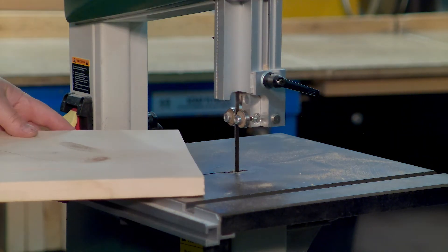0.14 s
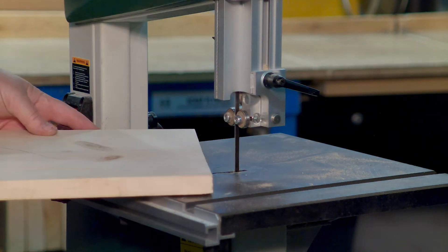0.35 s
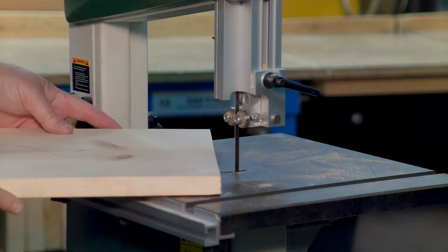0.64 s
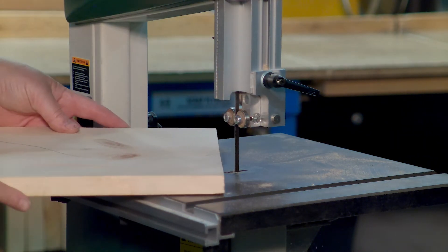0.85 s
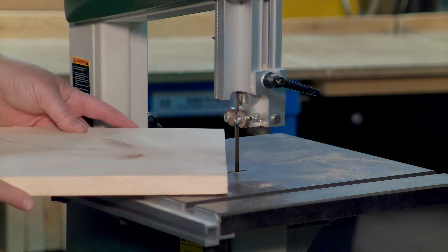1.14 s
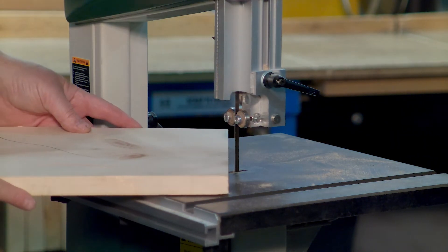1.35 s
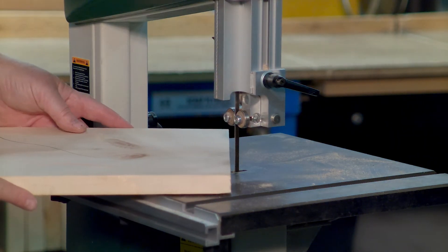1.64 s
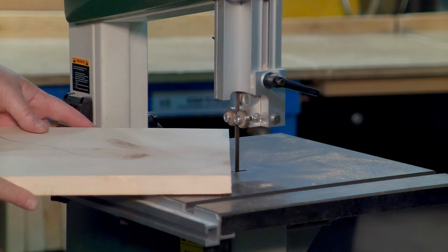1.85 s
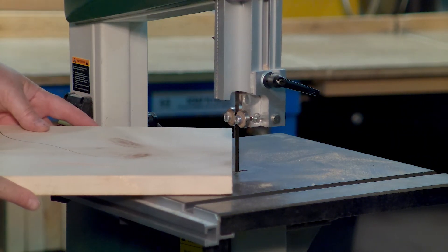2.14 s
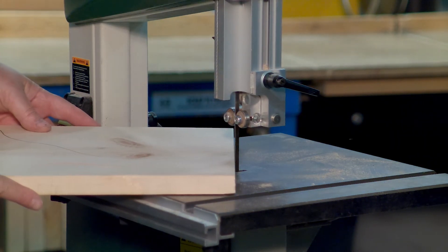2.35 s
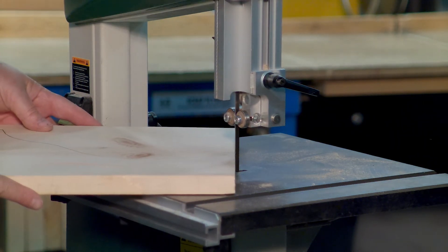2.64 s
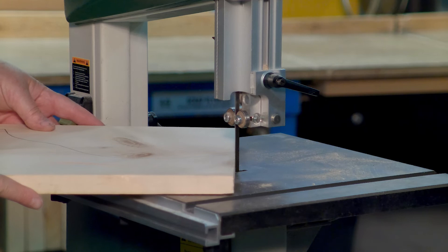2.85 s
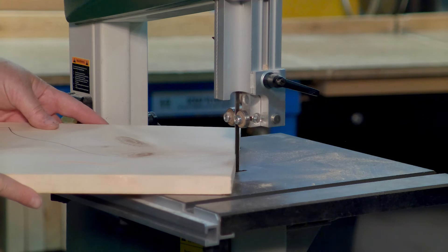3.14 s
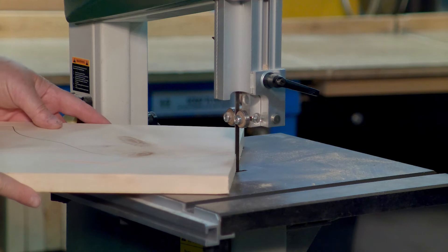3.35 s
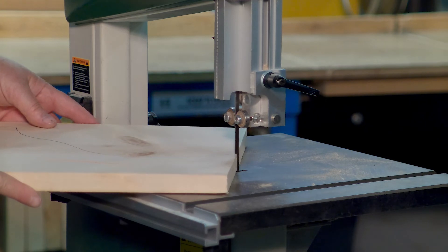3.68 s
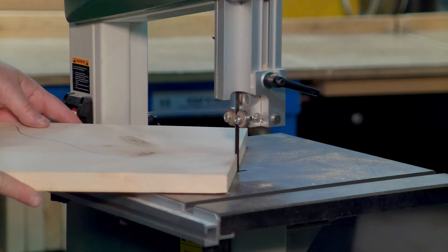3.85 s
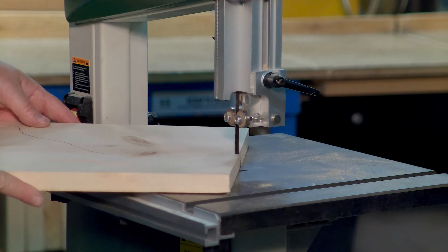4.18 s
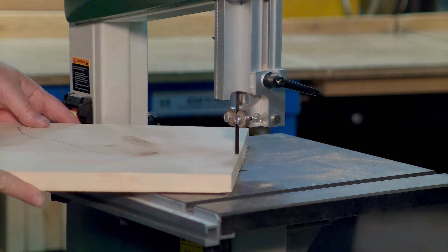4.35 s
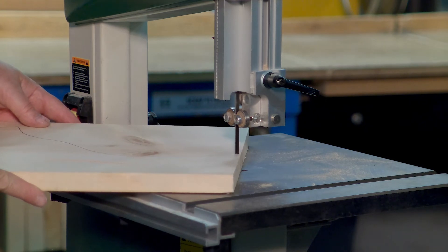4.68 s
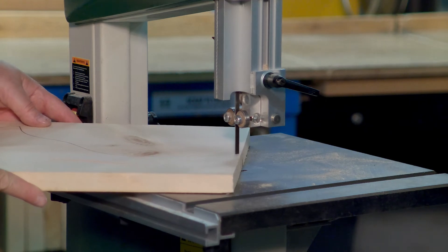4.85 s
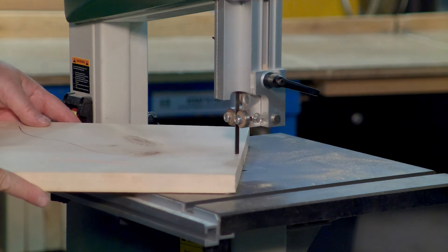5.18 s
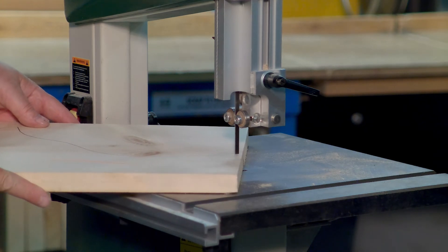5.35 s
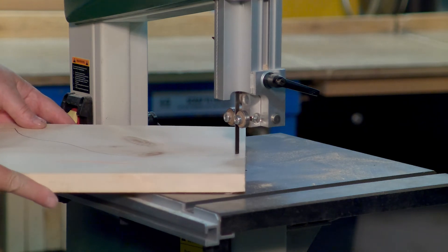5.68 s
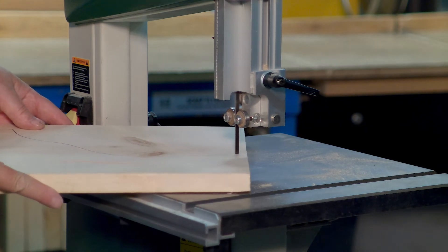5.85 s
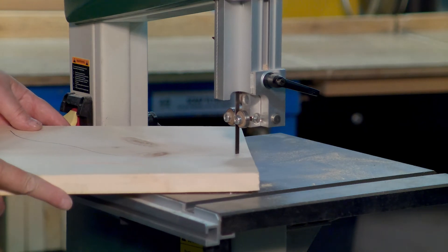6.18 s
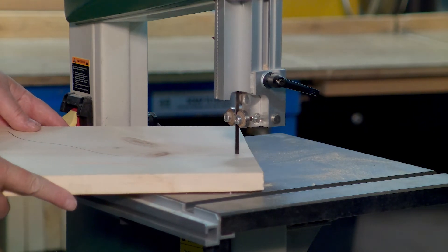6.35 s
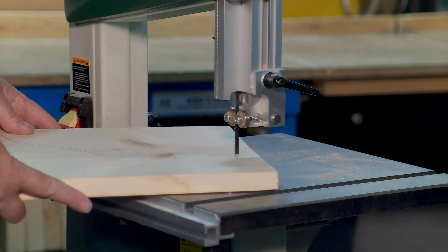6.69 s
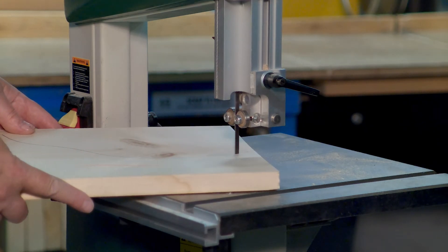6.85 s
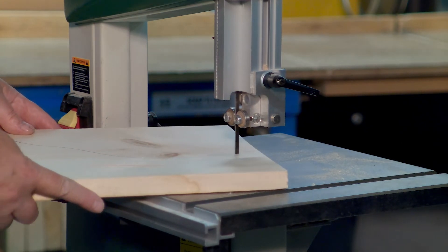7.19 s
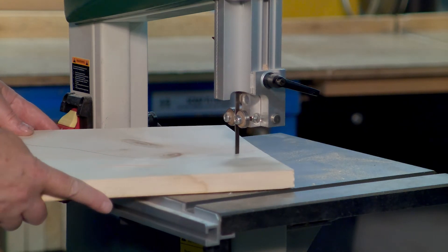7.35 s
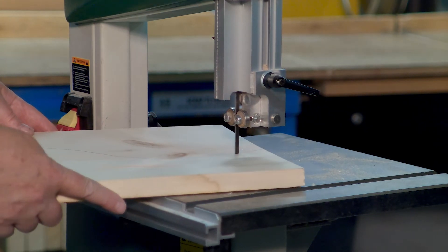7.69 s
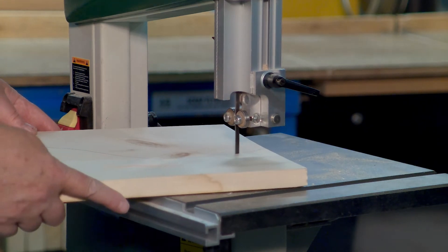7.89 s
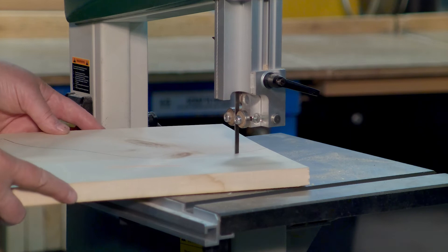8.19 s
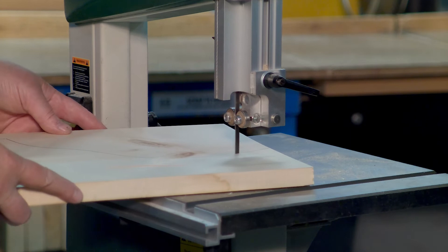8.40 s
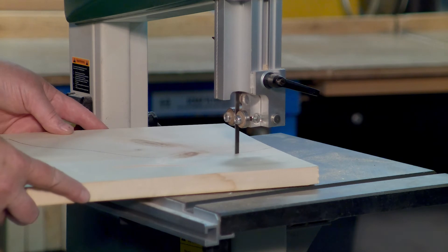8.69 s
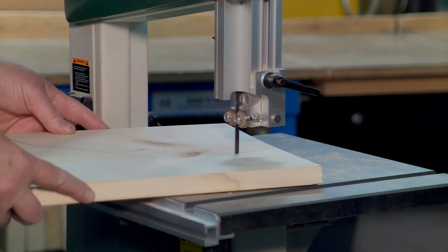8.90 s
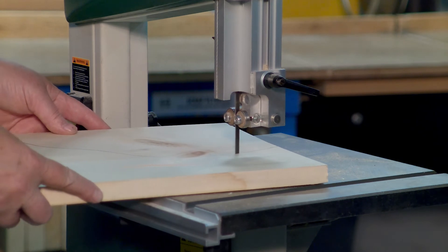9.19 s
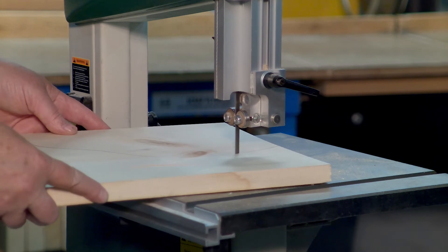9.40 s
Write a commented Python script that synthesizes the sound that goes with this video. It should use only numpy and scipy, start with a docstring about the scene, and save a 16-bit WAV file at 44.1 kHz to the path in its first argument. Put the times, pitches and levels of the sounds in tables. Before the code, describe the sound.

From 0 s a small band saw runs steadily close to the microphones, centred: a low throbbing motor hum, a rumbling sheet-metal housing, a thin wavering whine and a dense, bright steel hiss that pulses quickly with the wheels. At about 2.3 s a pine board meets the blade; several very short, piercing squeals cluster until 2.7 s, while gritty rasping, a fluttering high rub and hollow uneven chatter join. Sharp little knocks tick about eight times a second from 2.6 to 5.6 s, with a faint squeal at 3.4 s and another at 4.6 s. The level flickers down near 5.5 s. From 5.8 s the feed gradually eases, rasp and hum soften, and the sound opens widely to both sides. Isolated ticks fall around 5.7, 6.2, 7.0 and 7.2 s, with tiny squeaks between 6.5 and 6.8 s. A softer, hissing cut continues to the end.

```python
"""A benchtop band saw runs in a workshop, close to a stereo pair; a pine board is fed in along a curve.
The motor is a set of throbbing sines, the wheels are sines locked to their turning, and the frame
and the steel band hissing through its guides are noise shaped by spectra and resonances.
In the cut, tiny random blows rasp the board, the thrust bearing rubs and squeals, narrow noise chatters,
and the band's weld knocks, at first once a lap, later now and then. Late squeaks come as the sound opens out."""
import sys
import numpy as np
from scipy import signal
from scipy.fft import rfft, irfft, next_fast_len
from scipy.io import wavfile

SR = 44100
rng = np.random.default_rng(int(sys.argv[2]) if len(sys.argv) > 2 else 0)


def to_wav(sig):
    """Store sig (one row per channel, or 1-D mono) as 16-bit WAV at the path in sys.argv[1].

    Samples outside -1..1 are clipped; the rate is SR.
    """
    pcm = np.clip(np.atleast_2d(sig), -1, 1) * 32767
    pcm = np.round(pcm).astype(np.int16)
    wavfile.write(sys.argv[1], SR, pcm.T)  # frames by channels


N = 420273
T = np.arange(N) / SR  # time of every sample, s
HZ = np.fft.rfftfreq(N, 1 / SR)  # frequency of every spectral bin

LAP_S = 0.11883  # the band goes round once
# the feed: the board meets the teeth, is pushed hard, then is eased off and swung round the curve
ENTER_S, BITE_S = 2.36, 0.38
EASE_S, EASE_LENGTH_S, EASED_FEED = 5.76, 2.7, 0.26
SINK_S = 1.376  # time the blade takes to sink into the wood
# the wheels slow a little as the blade sinks
FREE_TURNS_PER_S, SAG_TURNS_PER_S = 18.75, 0.058
# the frame rumbles less with the blade buried, and less again as the feed eases
SUNK_RUMBLE_DB, EASED_RUMBLE_DB = -3.5, -3


def amp(db):
    """Decibels to gain."""
    return 10 ** (np.asarray(db) / 20)


def evened(x):
    """Scales to rms 1."""
    return x / np.sqrt(np.mean(x ** 2) + 1e-20)


def sine(turns):
    """A sine wave from its phase in turns."""
    return np.sin(2 * np.pi * turns)


def white():
    """White noise."""
    return rng.standard_normal(N)


def below(x, hz):
    """Keeps what lies below a frequency, with a steep smooth edge."""
    return irfft(rfft(x) / (1 + (HZ / hz) ** 12), N)


def curve(rows, axis=1):
    """One column of a time table, joined by straight lines at every sample."""
    columns = np.transpose(rows)
    return np.interp(T, columns[0], columns[axis])


def read(points, hz):
    """A spectrum table on a log-frequency axis."""
    f, value = np.transpose(points)
    return np.interp(np.log(hz + 1), np.log(f + 1), value)


def wander(rate_hz):
    """Slow random drift of rms 1, up to about this rate."""
    step = 16  # samples between drawn points
    size = next_fast_len(N // step + 2)
    hz = np.fft.rfftfreq(size, step / SR)
    slow = irfft(rfft(rng.standard_normal(size)) / (1 + (hz / rate_hz) ** 4), size)
    return evened(np.interp(T, np.arange(size) * step / SR, slow))


def fuzzy(angle, width_hz):
    """A narrow band of noise around a turning phase; rms 1."""
    return wander(width_hz / 2) * np.cos(angle) + wander(width_hz / 2) * np.sin(angle)


def body(drive, spectrum, modes=()):
    """Plays the drive through a broad spectrum with resonances on it; rms 1."""
    lift = 1  # power gain of the resonances
    for hz, width, db in modes:
        lift = lift + (amp(db) ** 2 - 1) / (1 + (2 * (HZ - hz) / width) ** 2)
    gain = amp(read(spectrum, HZ)) * np.sqrt(np.maximum(lift, 0.1))
    return evened(irfft(rfft(drive) * gain, N))


def ripple(depth_db, spacing_hz):
    """The many close, unevenly excited modes of a long steel band, as a gain at every frequency."""
    grid = np.arange(SR // 20)
    uneven = np.clip(rng.standard_normal(len(grid)), -2, 1.5)
    return amp(depth_db * np.interp(HZ / spacing_hz, grid, uneven))


def strikes(per_s, spread_db):
    """A dense train of tiny blows of uneven size."""
    hit = rng.random(N) < per_s / SR
    size = white() * amp(spread_db * np.clip(white(), -2, 2))
    return evened(hit * size)


def ramp(start_s, length_s):
    """Rises evenly from 0 to 1 and stays there."""
    return np.clip((T - start_s) / length_s, 0, 1)


def burst(start_s, length_s, attack_s, release_s):
    """Attack, hold and release, between 0 and 1."""
    return ramp(start_s, attack_s) * (1 - ramp(start_s + length_s, release_s))


def sunk():
    """How deep the blade sits in the board, 0-1."""
    return ramp(ENTER_S, SINK_S)


def eased():
    """How far the hands have let off to turn the board, 0-1."""
    return ramp(EASE_S, EASE_LENGTH_S)


def feed():
    """How hard the board is pushed into the teeth, 0-1."""
    return ramp(ENTER_S, BITE_S) * EASED_FEED ** eased()


def damping_db():
    """How much the board quiets the frame."""
    return SUNK_RUMBLE_DB * sunk() + EASED_RUMBLE_DB * eased()


def wheel_turns():
    """The angle of the wheels, in turns, from their sagging speed."""
    return np.cumsum(FREE_TURNS_PER_S - SAG_TURNS_PER_S * sunk()) / SR


# steady tones of the motor: pitch_hz [Hz], level_db [dB, before the scene's hum gain]
MOTOR_TONES = [(120, -74), (240, -41), (775.5, -53), (840, -56)]


def motor(beat=0.21, beat_hz=8.4, eased_beat=0.3, eased_db=-4.0, drift_db=3.1):
    """Magnetic hum and rotor tones; the hum throbs as the band goes round, more deeply once the feed eases."""
    depth = beat + eased_beat * eased()
    throb = 1 + depth * np.sin(2 * np.pi * (beat_hz * T + 0.26 * wander(5.3)))
    tones = sum(amp(db + drift_db * wander(6.9)) * sine(hz * T + rng.random()) for hz, db in MOTOR_TONES)
    return throb * amp(eased_db * eased()) * tones


# tones of the wheels: order [cycles a turn], level_db [dB against the common tone level]
WHEEL_ORDERS = [(13, -9), (17, -17), (19, -10), (21, -15.5), (23, -21), (32, -32), (33, -14.5), (36, -29),
                (38, -22.5), (39, -10), (41, -12.5), (43, -13)]
# whine of the drive: time_s [s], level_db [dB, before lift and waver]
WHINE_LEVEL = [(0.0, -43), (1.06, -39.5), (1.59, -43.5), (1.78, -38), (2.84, -46.5), (4.64, -42),
               (5.31, -48.5), (5.47, -37.5), (5.68, -52), (5.79, -41.5), (7.25, -47), (8.09, -42.5),
               (9.32, -47.5), (9.53, -40)]


def wheel_tones(turns, tones_db=-37.0, damping=2.27, whine_order=35, whine_lift_db=2.0,
                waver_db=2.1, eased_waver_db=1.2):
    """Multiples of the wheel speed, led by the drive's whine; the board on the table damps the weaker ones."""
    tones = 0
    for order, db in WHEEL_ORDERS:
        level = amp(db + 3.6 * wander(3.4))
        tones = tones + level * sine(round(order) * turns + rng.random() + 0.1 * wander(10))
    tones = amp(tones_db + damping * damping_db()) * tones
    whine = np.sin(2 * np.pi * whine_order * turns + 0.25 * wander(7))
    waver = (waver_db + eased_waver_db * eased()) * wander(9.3)
    whine = whine * amp(curve(WHINE_LEVEL) + whine_lift_db + waver)
    return np.sqrt(2) * (tones + whine)


# spectrum of the sheet-metal housing: pitch_hz [Hz], level_db [relative dB per Hz]
FRAME_SPECTRUM = [(20, -14.5), (90, -27.5), (160, -24.5), (205, -11), (240, -7.5), (285, 4.5), (335, -11),
                  (385, -5.5), (470, -13.5), (560, -14), (660, -2), (780, -7), (900, -9), (1050, -15.5),
                  (1400, -31.5), (3000, -60)]


def frame(turns, rumble_db=-38.02, jolt=0.1):
    """The unbalanced wheels rattle the sheet-metal housing: noise pulsing once a turn."""
    shake = white() * (1 + jolt * np.cos(2 * np.pi * turns))
    return amp(rumble_db + damping_db()) * body(shake, FRAME_SPECTRUM)


def ring_level(free_db=-21.5, feed_db=1.26, eased_db=-3.5, lag_s=0.29):
    """The steel rings louder under the feed, and is damped as the turning kerf closes on it."""
    closing = ramp(EASE_S + lag_s, EASE_LENGTH_S)
    return amp(free_db + feed_db * feed() + eased_db * closing)


# spectrum of the band in its guides: pitch_hz [Hz], level_db [relative dB per Hz]
HISS_SPECTRUM = [(500, -37.5), (950, -13.5), (1350, -17), (1800, -15.5), (2450, -4), (2700, -8.5),
                 (3600, -1.5), (4300, -0.5), (5150, -10), (6100, 0.5), (6800, -5.5), (9800, -1.5),
                 (11300, -9.5), (13700, -17.5), (15700, -19.5)]
# resonances of the steel, also heard in the rasp: pitch_hz [Hz], width_hz [Hz], level_db [dB of lift]
STEEL_MODES = [(3235, 50, 5), (3680, 35, 5), (4040, 70, 5), (4760, 60, 4), (5570, 45, 8), (6260, 80, 2),
               (7120, 40, 10), (7520, 260, 5), (8310, 70, 4), (8830, 50, 3), (9100, 80, 8), (9540, 35, 4),
               (10620, 300, 4), (11850, 250, 4), (13090, 70, 5), (14350, 250, 3)]


def blade(turns, split_hz=5200, top_hz=10900, free_sway_db=0.8, loaded_sway_db=0.1, settle_s=0.62,
          free_db=-22.0, feed_db=0.65, eased_db=-2.1, eased_top_db=-0.2, top_flicker_db=1.4):
    """The band scrapes through its guides and rings; running free, it sways with every turn of the wheels."""
    loaded = ramp(ENTER_S, BITE_S)
    sway_db = (free_sway_db + (loaded_sway_db - free_sway_db) * loaded) * np.cos(2 * np.pi * turns)
    scrape = irfft(rfft(white()) * ripple(depth_db=2.3, spacing_hz=36), N)
    steel = body(scrape, HISS_SPECTRUM, STEEL_MODES)
    # three bands: the ring below, the hiss between, the top above
    ring = below(steel, split_hz)
    top = steel - below(steel, top_hz)
    middle = steel - ring - top
    hiss_db = free_db + feed_db * feed() + eased_db * ramp(EASE_S - settle_s / 2, settle_s)
    hiss = amp(0.72 * wander(40)) * middle
    hiss = hiss + amp(eased_top_db * eased() + top_flicker_db * wander(25)) * top
    hiss = amp(hiss_db + sway_db + 0.47 * wander(11)) * hiss
    return hiss + ring_level() * amp(1.14 * wander(33)) * ring


def free_span(hz=3565, width_hz=55, below_ring_db=-14.5, flutter_db=2.2):
    """The stretch of band between the guides sings with one fluttering note."""
    note = fuzzy(2 * np.pi * hz * T, width_hz)
    return ring_level() * amp(below_ring_db + flutter_db * wander(10.0)) * note


# squeals of the thrust bearing: start_s [s], length_s [s], level_db [dB before flutter], pitch_hz [Hz]
BEARING_SQUEALS = [(2.32, .12, -23, 5980), (2.455, 0.029, -17.5, 6040), (2.505, 0.027, -19.5, 5970),
                   (2.56, 0.021, -25, 5970), (2.622, .022, -23, 5960), (3.4, .35, -32, 5880),
                   (4.57, 0.041, -24, 6060)]


def squeals(attack_s=0.012, release_s=0.017, width_hz=400, jitter_hz=30, flutter_db=0.5, purity=0.8):
    """Now and then the bearing catches and whistles, loudest at the first bite: a sine mixed with narrow noise."""
    level = sum(amp(db) * burst(s, length, attack_s, release_s) for s, length, db, hz in BEARING_SQUEALS)
    hz = curve(BEARING_SQUEALS, axis=3) + jitter_hz * wander(79)
    angle = 2 * np.pi * np.cumsum(hz) / SR
    # purity is the share of power in the sine
    voice = np.sqrt(1 - purity) * fuzzy(angle, width_hz) + np.sqrt(2 * purity) * np.cos(angle)
    return level * amp(flutter_db * wander(26)) * voice


# spectrum of the torn chips: pitch_hz [Hz], level_db [relative dB per Hz]
CHIP_SPECTRUM = [(300, -62), (600, 4), (900, -2), (1450, -6), (2000, 9.5), (2700, -15), (3300, -10),
                 (5000, 9), (9000, -1), (15700, -0.5)]
# resonances of the board and the band in the kerf: pitch_hz [Hz], width_hz [Hz], level_db [relative dB]
KERF_MODES = [(1754, 43, -2.5), (1919, 240, -1), (2250, 26, -3), (2323, 80, 1)]


def rasp(chips_db=-33.5, ring_db=-40.5, flare_db=3.5, bite_db=0.1, grain_db=1.0):
    """Teeth tear chips, biting slightly harder twice a lap; each kerf resonance flares up by itself."""
    bite = bite_db * np.cos(4 * np.pi * T / LAP_S) + grain_db * wander(4.1)
    grit = strikes(per_s=5000, spread_db=1.6) * amp(1.4 * wander(45))
    chips = amp(chips_db) * body(grit, CHIP_SPECTRUM, STEEL_MODES)
    ring = 0
    for hz, width, db in KERF_MODES:
        ring = ring + fuzzy(2 * np.pi * hz * T, width) * amp(db + ring_db + flare_db * wander(40))
    return feed() * amp(bite) * (chips + ring)


def chatter(hz=1136, width_hz=70, level_db=-45.0, flutter_db=5.0, stop_s=8.3, release_s=0.7,
            twist_s=4.83, twist_length_s=1.2, twist_db=1.5):
    """The band chatters in the kerf in uneven pulses, lifted as the board is twisted into the curve."""
    push = np.sqrt(feed()) * (1 - ramp(stop_s, release_s))
    twist = burst(twist_s, twist_length_s, attack_s=0.1, release_s=0.3)
    level = amp(level_db + twist_db * twist + flutter_db * wander(14))
    return push * level * fuzzy(2 * np.pi * hz * T, width_hz)


def thrust(level_db=-31, start_hz=5964, sag_hz_per_s=90, drift_hz=60, width_hz=480, flutter_db=2.5,
           attack_s=0.33, end_s=5.93, release_s=0.77):
    """The band's back rubs the bearing until the push lets off: a narrow, fluttering hiss, sinking in pitch."""
    hz = start_hz - sag_hz_per_s * (T - ENTER_S) + drift_hz * wander(3)
    push = burst(ENTER_S, end_s - ENTER_S, attack_s, release_s)
    hiss = fuzzy(2 * np.pi * np.cumsum(hz) / SR, width_hz)
    return push * amp(level_db + flutter_db * wander(26)) * hiss


# weld knocks: a long run at lap spacing, then four lone knocks:
# start_s [s], knocks [count, a lap apart], level_db [dB, before the two trims below]
WELD_KNOCKS = [(2.5635, 26, -24), (5.7108, 1, -23), (6.1858, 1, -24.5), (6.999, 1, -26.5), (7.236, 1, -28)]
# spectrum of the weld's scratch: pitch_hz [Hz], level_db [relative dB per Hz]
SCRATCH_SPECTRUM = [(150, -50), (500, -18), (900, -2), (1400, -5), (1900, 0), (4000, -2), (7000, -18)]


def weld(hz=1750, length_s=0.00393, lag_s=0.00265, fall=0.0341, decay_s=0.0038, uneven_db=1.5,
         chirp_trim_db=-1.7, scratch_trim_db=1.7):
    """The band's thick joint drags through the kerf, at first once a lap, later only now and then:
    a sharp scratch and a short falling chirp."""
    knocks = [(first + lap * LAP_S, db) for first, count, db in WELD_KNOCKS for lap in range(round(count))]
    chirps, force = np.zeros(N), np.zeros(N)
    chance = rng.standard_normal((len(knocks), 4))
    for (s, db), (detune, phase, luck, strength) in zip(knocks, chance):
        near = abs(T - s) < LAP_S / 2
        t = T[near] - s
        u = (t - lag_s) / length_s  # time from the chirp's peak, in its own lengths
        pitch = hz * (1 + 0.0112 * detune - fall * u)
        angle = 2 * np.pi * np.cumsum(pitch) / SR + phase
        swell = np.exp(-u ** 2 / 2)
        chirps[near] += amp(db + chirp_trim_db + uneven_db * strength) * swell * np.cos(angle)
        decay = (t > 0) * np.exp(-abs(t) / decay_s)
        force[near] += amp(db + scratch_trim_db + 2 * np.tanh(luck)) * decay
    scratch = force * white()
    return chirps + scratch.std() * body(scratch, SCRATCH_SPECTRUM)


# squeaks as the turning board pinches the band:
# center_s [s], pitch_hz [Hz], then level_db of harmonics 1, 2, 3, 4 [dB rms at the peak]
PINCH_SQUEAKS = [(6.470, 726, -36, -34, -29, -30), (6.682, 730, -38, -35, -30, -29),
                 (6.829, 694, -34, -30.5, -47, -39)]


def squeaks(fall=0.0131, length_s=0.006):
    """Stick and slip of wood on steel: short falling harmonic chirps."""
    out, rough = np.zeros(N), wander(150)
    for s, hz, *levels_db in PINCH_SQUEAKS:
        near = abs(T - s) < 4 * length_s
        u = (T[near] - s) / length_s
        angle = 2 * np.pi * np.cumsum(hz * (1 - fall * u + 0.0088 * rough[near])) / SR
        voice = sum(amp(db) * np.sin(k * angle) for k, db in enumerate(levels_db, 1))
        out[near] += np.sqrt(2) * np.exp(-u ** 2 / 2) * voice
    return out


def sawing(turns):
    """The noises of the machine and the cut, without the steady motor and wheel tones."""
    machine = frame(turns) + blade(turns) + free_span()
    cut = squeals() + rasp() + chatter() + thrust() + weld() + squeaks()
    return machine + cut


def scene(hum_db=2.5, hum_side_db=1.0, whine_side_db=-6.0, open_s=5.6, open_time_s=0.97):
    """The saw close by and in the middle of the stereo pair; later its sound spreads to both sides."""
    turns = wheel_turns()
    hum, whine = amp(hum_db) * motor(), wheel_tones(turns)
    middle = sawing(turns) + hum + whine
    # noise is drawn afresh for the sides; steady tones reach both sides equally loud but out of phase
    around = sawing(turns) + amp(hum_side_db) * hum + amp(whine_side_db) * whine
    diffuse = signal.hilbert(around).imag
    opening = 1 - np.exp(-np.maximum(T - open_s, 0) / open_time_s)
    side = opening * diffuse
    return middle + np.array([side, -side])


# brief dips of the whole level: start_s [s], length_s [s], level_db [dB]
LEVEL_DIPS = [(5.543, .024, -6), (5.58, 0.035, -4)]


def record(dry, ceiling=0.42, edge_hz=15720):
    """The level dips briefly, the highest peaks are softly limited, then the treble ends at the band edge."""
    dip_db = sum(db * burst(s, length, attack_s=0.0033, release_s=0.012) for s, length, db in LEVEL_DIPS)
    x = dry * amp(dip_db)
    x = x / (1 + (x / ceiling) ** 6) ** (1 / 6)
    lowpass = signal.firwin(511, edge_hz, window=("kaiser", 9), fs=SR)
    return signal.oaconvolve(x, lowpass[None], "same")


dry = scene()
out = record(dry)
to_wav(out)
```